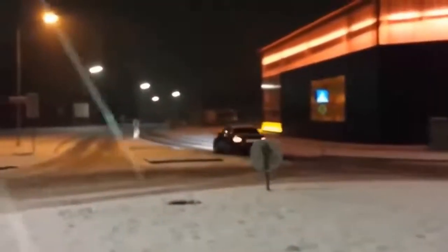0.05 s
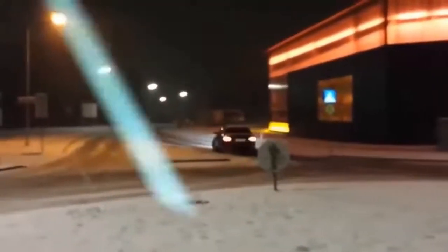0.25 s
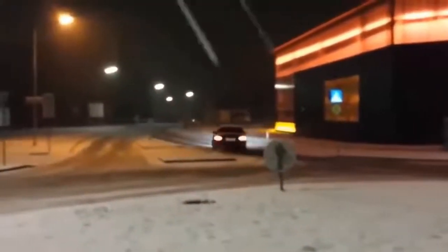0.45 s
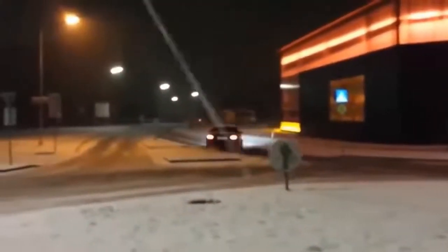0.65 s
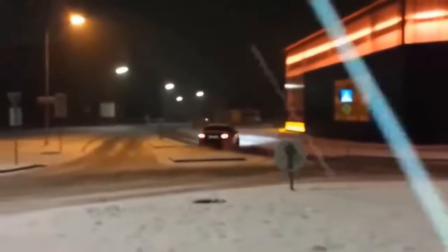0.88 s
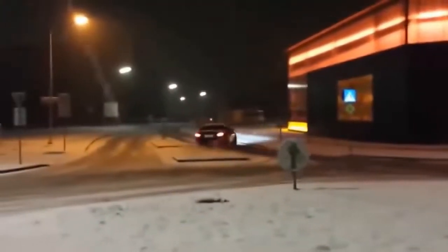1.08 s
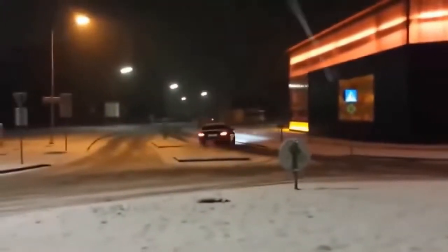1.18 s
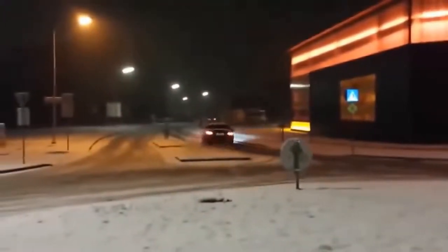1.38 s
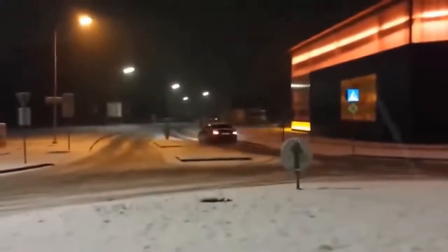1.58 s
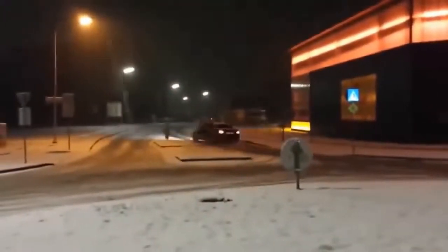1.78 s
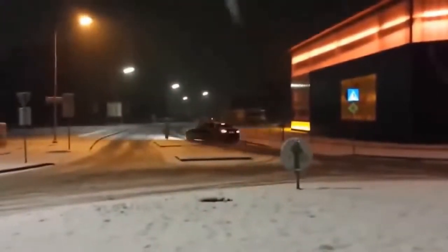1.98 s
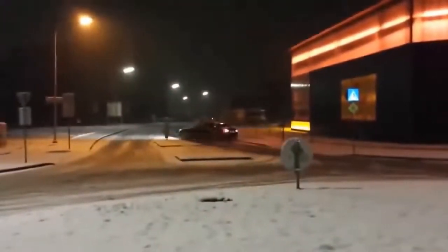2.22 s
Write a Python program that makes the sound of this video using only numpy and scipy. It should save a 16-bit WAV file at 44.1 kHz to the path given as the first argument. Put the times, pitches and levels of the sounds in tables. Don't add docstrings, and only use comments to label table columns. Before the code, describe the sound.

Tyres slide hissing over crusty snow with low rumble, a hard wheel thump, then crackling ice

```python
import sys
import numpy as np
from scipy import signal
from scipy.fft import rfft, irfft, next_fast_len
from scipy.io import wavfile
from scipy.ndimage import uniform_filter1d, map_coordinates

SR = 44100
rng = np.random.default_rng(int(sys.argv[2]) if len(sys.argv) > 2 else 0)


def output_pcm(signal):
    pcm = np.clip(np.atleast_2d(signal).T, -1, 1) * 32767
    wavfile.write(sys.argv[1], SR, np.round(pcm).astype(np.int16))


def gain_from_db(level_db):
    decades = np.asarray(level_db, float) / 20
    return 10 ** decades


N = 99225

# start_s, spray_db, crush_db, crust_pitch_hz, road_load_db, spray_brightness_db, wet_spray_db
SLIDE = [(0, -39, -44.5, 1200, -47.5, -1, 3), (.19, -36, -43.5, 1400, -52.5, -1, -2),
         (.25, -32, -41.5, 1420, -50.5, -2, -2), (.55, -31.5, -44, 1320, -43.5, 2.5, 1.5),
         (.715, -30, -39.5, 1250, -45, -1, 2.5), (.79, -31, -37.5, 1520, -45.5, 0.5, 6),
         (.88, -36, -42.5, 1300, -47, 0, 4.5), (1.0, -38, -45, 1110, -40, 1.5, 4),
         (1.12, -33.5, -42.5, 990, -43, 2.5, -2.5), (1.24, -33.5, -44, 950, -37.5, -0.5, -3.5),
         (1.29, -32, -51, 1020, -50, 0.5, 1), (1.4, -32, -48.5, 1200, -42.5, 0.5, 0.5),
         (1.5, -32, -36.5, 1760, -41, 1, 2.5), (1.66, -37, -44, 1550, -45, -1.5, 0),
         (1.76, -37.5, -37, 1600, -44, -2.5, -7), (1.86, -37.5, -37, 1510, -45, -1, 1.5),
         (2.12, -43.5, -44, 1570, -50, -0.5, 4), (2.25, -52, -60, 1410, -55.5, -1, 3)]
# start_s, grip_db
HOP = [
    (1.335, -0.5),
    (1.355, -7.5),
    (1.384, -7),
    (1.389, 2),
    (1.41, 1),
]
# pitch_hz, density_db (per Hz)
SPRAY_COLOUR = [(530, -26), (900, -6.5), (2060, -3.5), (2250, -7), (2980, -4), (5190, -5), (7200, -5),
                (9550, -9.5), (12100, -32.5), (15800, -62), (22000, -120)]
CRUST_BANDS_HZ = (950, 1300, 1750)
# pitch_hz, density_db (per Hz)
RUMBLE_COLOUR = [(15, -47), (25, -8.5), (112, 0), (188, -2.5), (223, -1.5), (264, -10), (380, -17.5),
                 (490, -26), (840, -120)]
# start_s, firing_hz, level_db
REVS = [
    (0, 92, -60),
    (.25, 103, -51),
    (.6, 122, -51),
    (.95, 148, -51),
    (1.15, 170, -60),
    (1.45, 205, -58),
    (1.58, 232, -48),
    (1.9, 182, -55),
    (2.25, 135, -62),
]
# firing_multiple, level_db
ENGINE_ORDERS = [
    (1, 0),
    (2, -13),
    (3, -10),
]
# start_s, peak_db, pitch_hz,
# ring_cycles (to -60 dB)
ICE_LUMPS = [(0.055, -28, 1770, 15), (.214, -21, 1640, 20), (.705, -20, 1500, 4.9), (0.722, -27, 1500, 11),
             (.781, -22, 1800, 8.1), (.834, -12.5, 1715, 5), (.861, -24, 1180, 17),
             (.948, -20.5, 1080, 8.5), (1.0, -25, 1130, 18), (1.007, -21, 1070, 17), (1.2375, -18, 424, 9),
             (1.07, -22.5, 560, 11.4), (1.0742, -14.5, 730, 3.2), (1.187, -35, 560, 8.9),
             (1.194, -30, 960, 14), (1.2775, -17.5, 704, 4.9), (1.3875, -23.5, 2080, 22),
             (1.389, -42, 3100, 21), (1.389, -23.5, 1055, 58), (1.394, -24, 983, 53), (1.4, -23, 1037, 60),
             (1.413, -25, 1740, 40), (1.452, -19, 1210, 3.6), (1.459, -29, 2020, 13),
             (1.476, -27, 1700, 71), (1.495, -21.5, 1710, 54), (1.511, -22, 1700, 51),
             (1.552, -29, 1810, 40), (1.625, -24, 1380, 19), (1.687, -21, 1240, 11),
             (1.702, -20.5, 1530, 35), (1.7205, -12.5, 1126, 17.4), (1.7262, -21.5, 1070, 25),
             (1.744, -22.5, 1770, 61), (1.7704, -18, 1400, 3.6), (1.777, -26.5, 616, 16),
             (1.782, -29, 1900, 8.9), (1.8, -21, 1220, 7.7), (1.824, -22, 1110, 23), (1.83, -18, 1580, 13),
             (1.8518, -22.5, 1150, 32), (1.862, -21, 1220, 15), (1.875, -21, 1400, 13),
             (1.883, -18, 1720, 15), (1.89, -22, 1130, 17), (2.109, -31, 1320, 10)]
# start_s, boom_db, knock_db
BLOWS = [(1.007, -28, -59), (1.041, -30, -68), (1.074, -27, -33), (1.131, -28, -38), (1.178, -28.5, -49),
         (1.237, -13, -26), (1.2577, -9.5, -9.5), (1.278, -31, -25), (1.298, -52, -31), (1.326, -22.5, -30),
         (1.421, -27, -47), (1.809, -43, -49)]
# pitch_hz, level_db, t60_s
BODY_MODES = [
    (58.3, -19, 0.31),
    (101.6, -8, 0.22),
    (131.7, -1, 0.17),
    (185, -1.5, 0.11),
    (265.5, -11.5, 0.14),
]
# pitch_hz, level_db, t60_s
WHEEL_MODES = [
    (358, -15.5, 0.24),
    (459, -7.5, 0.16),
    (499, 0.5, 0.055),
    (560, 6.5, 0.036),
    (605, -1.5, 0.029),
    (785, -14, 0.064),
    (1007, -15.5, 0.098),
]
# delay_ms, level_db, phase_rad
NEAR_ECHOES = [
    (.32, -15, -2.0),
    (1.72, -12.5, -1.7),
    (1.99, -12.5, .3),
    (2.31, -20, .7),
]
# pitch_hz, level_db
MIC = [(20, -28), (55, -0.5), (9500, -0.5), (11300, -1.5), (12300, -20)]


def unit(x):
    return x / np.sqrt(np.mean(x ** 2) + 1e-20)


def curves(rows):
    s, *columns = np.transpose(rows)
    return [np.interp(np.arange(N) / SR, s, column) for column in columns]


def wobble(rate):
    knots = rng.standard_normal(int(N * rate / SR) + 4)
    return map_coordinates(knots, [np.arange(N) * rate / SR])


def filtered(x, response):
    size = next_fast_len(N + 8192)
    return irfft(rfft(x, size) * response(np.fft.rfftfreq(size, 1 / SR)), size)[:N]


def peak(hz, width_hz):
    return lambda f: (1j * f * width_hz / (hz * hz - f * f + 1j * f * width_hz)) ** 2


def colour(points):
    point_hz, db = np.transpose(points)
    return lambda f: gain_from_db(np.interp(np.log(f + 1), np.log(point_hz + 1), db))


def rush(response, patchy_db):
    z = signal.stft(rng.standard_normal(N), nperseg=512)[2]
    patches = uniform_filter1d(rng.standard_normal(z.shape), 10, 0)
    patches = unit(uniform_filter1d(patches, 10, 1))
    noise = signal.istft(z * gain_from_db(patchy_db * patches), nperseg=512)[1][:N]
    return unit(filtered(noise, response))


def grains(s, hz, gain, t60_cycles, size, rise_cycles=0.22):
    cycles = hz[:, None] * np.arange(size) / SR
    rise = 1 - np.exp(-(cycles / rise_cycles) ** 2)
    wave = gain[:, None] * np.sin(2 * np.pi * cycles) * gain_from_db(-60 * cycles / t60_cycles) * rise
    at = np.round(s * SR).astype(int)[:, None] + np.arange(size)
    return np.bincount(at.ravel(), wave.ravel(), N + size + 1)[:N]


def scatter(count):
    u = rng.random((count, 4))
    s = u[:, 0] * (N - 1) / SR
    normal = np.sqrt(-2 * np.log(u[:, 1])) * np.cos(2 * np.pi * u[:, 3])
    return s, normal, np.minimum(-np.log(u[:, 2]), 3.5)


def snow_spray(bright_db, wet_db):
    s, g, e = scatter(count=5000)
    speck_hz = np.clip(5000 * np.exp(0.39 * g), 1500, 9500)
    specks = unit(grains(s, speck_hz, gain_from_db(4.3 * e), 4.4, size=96))
    mist = unit(rush(colour(SPRAY_COLOUR), patchy_db=2.06) + gain_from_db(-6) * specks)
    fine = filtered(mist, lambda f: 1 / (1 + (5500 / (f + 1)) ** 6))
    wet = filtered(mist, lambda f: 1 / (1 + (f / 2400) ** 10))
    body = mist - fine - wet + gain_from_db(wet_db) * wet
    return gain_from_db(-bright_db) * body + gain_from_db(bright_db) * fine


def scrape(crust_hz):
    shares = [np.interp(crust_hz, CRUST_BANDS_HZ, row) for row in np.eye(3)]
    return sum(np.sqrt(share) * rush(peak(hz, 0.45 * hz), patchy_db=3.0)
               for share, hz in zip(shares, CRUST_BANDS_HZ))


def crushed_crust(crust_hz):
    s, g, e = scatter(count=2400)
    hz = crust_hz[(s * SR).astype(int)] * np.exp(0.21 * g)
    crust = unit(grains(s, hz, gain_from_db(3 * e), 6.64, size=512, rise_cycles=0.94))
    return unit(crust + gain_from_db(-4.5) * scrape(crust_hz))


def road_drone(load_db):
    drone = gain_from_db(load_db + 1.5 * wobble(25)) * rush(peak(560, 313), patchy_db=1.2)
    rumble_db = -46 + 0.55 * (load_db - load_db.mean()) + 1.5 * wobble(14.0)
    return drone + gain_from_db(rumble_db) * rush(colour(RUMBLE_COLOUR), patchy_db=-0.5)


def tyres():
    spray_db, crush_db, crust_hz, load_db, bright_db, wet_db = curves(SLIDE)
    grip_db, = curves(HOP)
    shake_db = 0.2 * wobble(9) + 0.6 * wobble(35)
    spray = gain_from_db(spray_db + grip_db + shake_db) * snow_spray(bright_db, wet_db)
    crush_gain = gain_from_db(crush_db + 2 * grip_db + shake_db + 0.24 * wobble(25.2))
    return spray + crush_gain * crushed_crust(crust_hz) + road_drone(load_db)


def engine():
    hz, db = curves(REVS)
    phase = 2 * np.pi * np.cumsum(hz * (1 + 0.0105 * wobble(30.2))) / SR
    orders = sum(gain_from_db(order_db + 2.2 * wobble(14)) * np.sin(k * phase) for k, order_db in ENGINE_ORDERS)
    return np.sqrt(2) * gain_from_db(db) * orders


def gust():
    level_db, t60_s = -41.5, 1.6
    return gain_from_db(level_db - 60 * np.arange(N) / SR / t60_s) * rush(peak(71, 160), patchy_db=3.0)


def lumps():
    s, db, hz, ring_cycles = np.transpose(ICE_LUMPS)
    rise_cycles, tail_db, tail_s = 0.95, -15, 0.066
    crack_gain = gain_from_db(db + 60 * rise_cycles / ring_cycles)
    cracks = grains(s, hz, crack_gain, ring_cycles[:, None], size=2048, rise_cycles=rise_cycles)
    late, pitch, level = np.moveaxis(rng.random((len(s), 3, 6)), 1, 0)
    bit_s = s[:, None] + 0.003115 + tail_s * late / 2
    bit_hz = hz[:, None] * (1.22 + 0.5 * pitch)
    bit_db = db[:, None] + tail_db - 12.0 * late + 3.5 * level
    return cracks + grains(bit_s.ravel(), bit_hz.ravel(), gain_from_db(bit_db).ravel(), 10.0, size=768)


def street(x):
    t = np.arange(SR // 2) / SR
    tail = rng.standard_normal(len(t)) * gain_from_db(-60 * t / 0.42) * (t > 0.012)
    return signal.fftconvolve(x, tail / np.linalg.norm(tail))[:N]


def struck(modes, rise_s):
    t = np.arange(SR // 2) / SR
    ring = 0
    for hz, db, t60_s in modes:
        decay = gain_from_db(db + rng.normal(0, 0.8) - 60 * t / t60_s)
        ring = ring + decay * np.sin(2 * np.pi * hz * t + rng.normal(0, 0.3))
    return ring * (1 - np.exp(-(t / rise_s) ** 2))


def kerb():
    out = np.zeros(N + SR)
    for s, boom_db, knock_db in BLOWS:
        boom = gain_from_db(boom_db - 1.0) * struck(BODY_MODES, rise_s=0.011)
        knock = gain_from_db(knock_db - 4.5) * struck(WHEEL_MODES, rise_s=0.002)
        out[round(s * SR):][:len(boom)] += boom - knock
    return out[:N]


def scene():
    hits = lumps() + kerb()
    mix = tyres() + engine() + gust() + hits + gain_from_db(-7) * street(hits)
    return mix[None]


def band_limit(x):
    return signal.sosfilt(signal.butter(12, 12290, fs=SR, output="sos"), x)


def record(dry):
    def response(f):
        echoes = sum(gain_from_db(db) * np.exp(-1j * (2 * np.pi * f * ms / 1000 + rad)) for ms, db, rad in NEAR_ECHOES)
        return colour(MIC)(f) * (1 + echoes / (1 + (f / 8150) ** 8))

    heard = filtered(dry[0], response)
    return band_limit(heard[None])


dry = scene()
out = record(dry)
output_pcm(out)
```